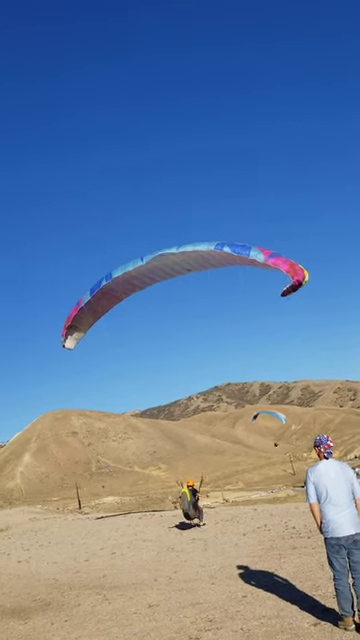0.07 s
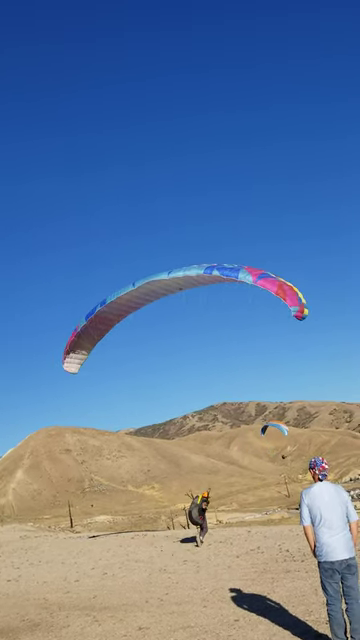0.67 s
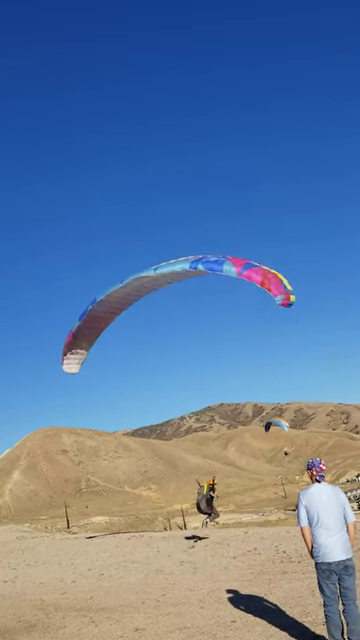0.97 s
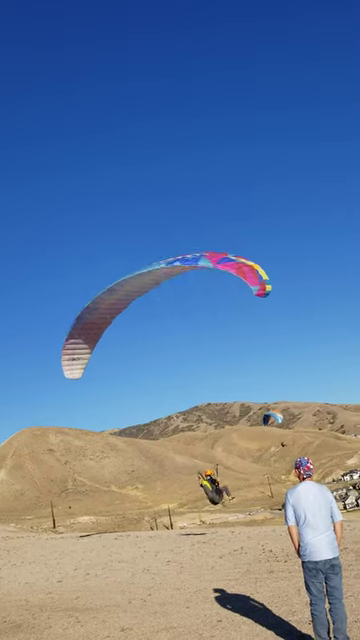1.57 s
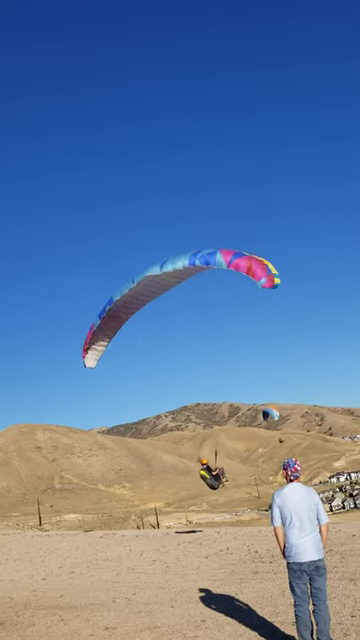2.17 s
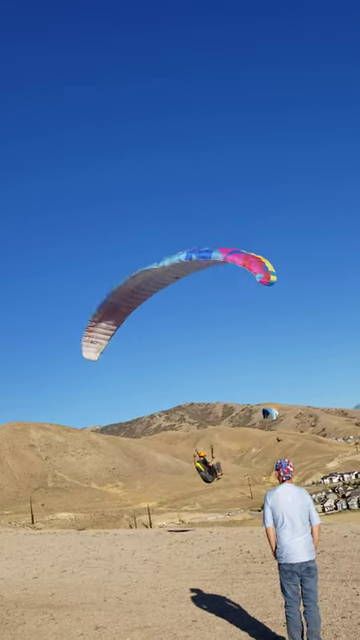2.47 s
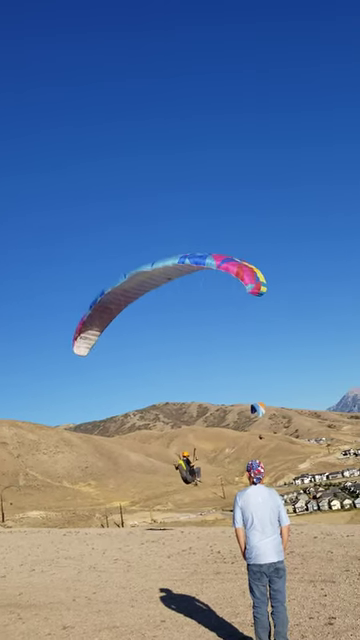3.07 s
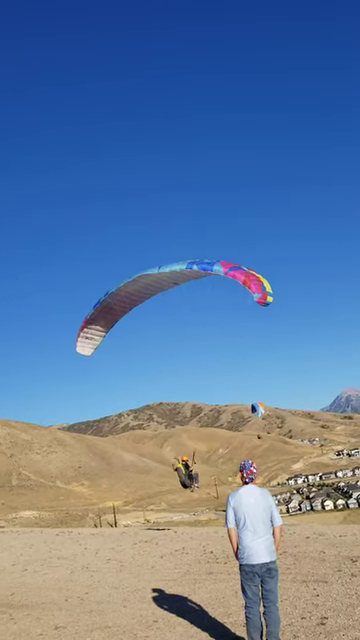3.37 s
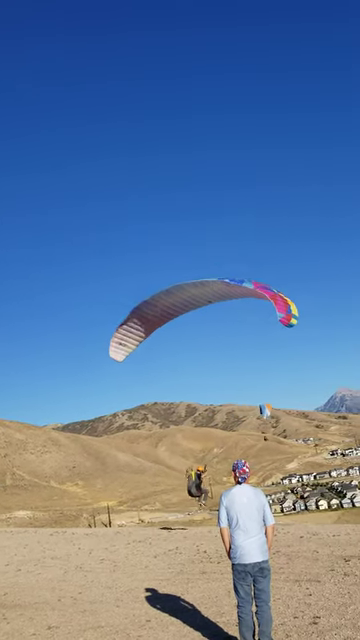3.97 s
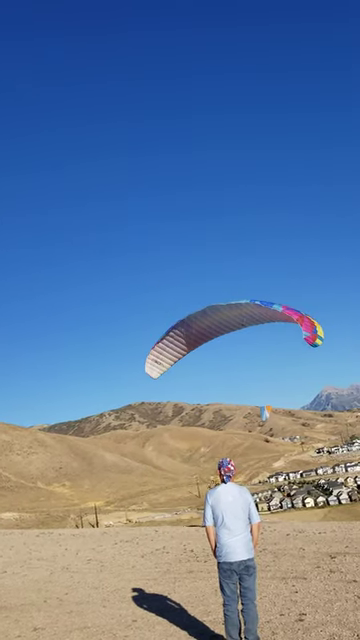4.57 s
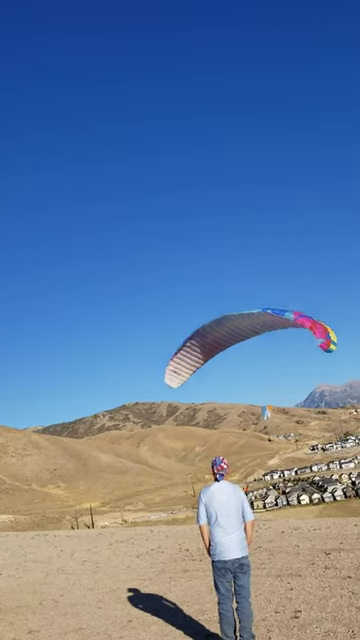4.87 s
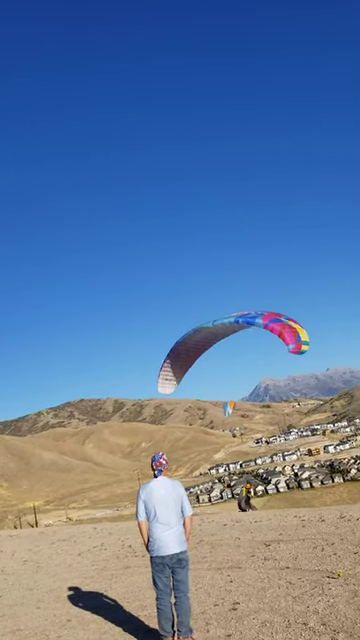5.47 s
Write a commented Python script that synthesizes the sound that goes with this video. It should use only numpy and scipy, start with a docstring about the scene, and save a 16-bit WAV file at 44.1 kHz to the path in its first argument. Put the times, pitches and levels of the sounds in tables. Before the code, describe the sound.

Wind rumbles and thumps on the microphone on an open hillside, with a faint rustle of paraglider fabric.

```python
"""On an open hillside, wind buffets the two ports of a hand-held microphone.
Passing eddies make the pressure at the ports fluctuate: they rumble, flutter and thump,
and the left port drops into lulls as the flow leaves it. Behind them the air on the slope roars,
with a faint tone in it. A dry rustle, as of fabric in the wind, swells in the middle,
and the thin hiss of the microphone lies under it all."""
import sys
import numpy as np
from scipy import signal
from scipy.fft import irfft, next_fast_len
from scipy.io import wavfile
from scipy.ndimage import uniform_filter1d

SR = 44100
rng = np.random.default_rng(int(sys.argv[2]) if len(sys.argv) > 2 else 0)


def wav_out(sig):
    """Save sig, one row per channel (or a flat mono array), as 16-bit PCM at SR to the path in sys.argv[1]."""
    wavfile.write(sys.argv[1], SR, np.round(np.clip(np.atleast_2d(sig).T, -1, 1) * 32767).astype(np.int16))


N = 247842
TIME = np.arange(N) / SR
FFT_SIZE = next_fast_len(N, real=True)
BIN_HZ = np.fft.rfftfreq(FFT_SIZE, 1 / SR)


def gain(db):
    """Amplitude ratio of a level in decibels."""
    return 10 ** (np.asarray(db) / 20)


def unit_rms(x):
    """Normalisation to rms 1."""
    return x / np.sqrt(np.mean(x ** 2) + 1e-20)


def gaussian(offset, width):
    """Bell curve of height 1."""
    return np.exp(-.5 * np.clip(offset / width, -10, 10) ** 2)


def over_time(rows):
    """Table columns interpolated at every sample."""
    time_s, *columns = np.transpose(rows)
    return np.array([np.interp(TIME, time_s, column) for column in columns])


def over_frequency(rows):
    """Table columns interpolated over log frequency at every bin."""
    hz, *columns = np.transpose(rows)
    return np.array([np.interp(np.log(BIN_HZ + 1), np.log(hz), column) for column in columns])


def waveform(spectrum):
    """Inverse Fourier transform, scaled to rms 1."""
    return unit_rms(irfft(spectrum, FFT_SIZE)[..., :N])


def white_spectra():
    """Two independent white-noise spectra, one for each port."""
    real, imaginary = rng.standard_normal((2, 2, len(BIN_HZ)))
    return real + 1j * imaginary


def noise(spectrum):
    """Coloured noise, incoherent between the ports."""
    return waveform(white_spectra() * gain(over_frequency(spectrum)))


def wander(rate_hz):
    """Low-pass noise: a smooth random modulator for each port."""
    return waveform(white_spectra() * np.exp(-np.minimum(BIN_HZ / rate_hz, 10) ** 2))


def arriving_noise(spectrum, coherence, lag_s):
    """Path difference: partly coherent noise reaches the left port first."""
    left, independent = white_spectra()
    shared = np.clip(over_frequency(coherence)[0], 0, 1)
    right = shared * left + np.sqrt(1 - shared ** 2) * independent
    delay = np.exp(-2j * np.pi * BIN_HZ * lag_s)
    return waveform(np.array([left, right * delay]) * gain(over_frequency(spectrum)))


def scintillate(x, depth_db, patch_hz, patch_s=0.076):
    """Scintillation: turbulent air shifts a sound's level in patches of frequency and time."""
    frame, hop = 1024, 256
    cells = signal.stft(x, nperseg=frame, noverlap=frame - hop)[2]
    patches = rng.standard_normal(cells.shape[1:])
    patches = uniform_filter1d(patches, max(1, round(patch_hz * frame / SR)), axis=0)
    patches = uniform_filter1d(patches, max(1, round(patch_s * SR / hop)), axis=1)
    cells = cells * gain(depth_db * unit_rms(patches))
    return unit_rms(signal.istft(cells, nperseg=frame, noverlap=frame - hop)[1][:, :N])


# Relative spectral density of the hiss: frequency_hz, left_db, right_db
HISS_SPECTRUM = [(1420, 12, 9), (4200, -11, -4.5), (5640, -25, -23), (6350, -19, -13), (6300, -11, -2),
                 (7430, -21, -16), (9200, -10, -20), (11930, 1.5, 2.5), (15500, 5, -1)]
def hiss(level_db=-72.5, flicker_db=1.5):
    """Self-noise: the microphone adds a thin, nearly steady hiss."""
    return noise(HISS_SPECTRUM) * gain(level_db + flicker_db * wander(rate_hz=66))


# Envelope of the tone in the roar: time_s, level_db
MOAN_LEVEL = [(0, -84), (.7, -69.5), (3.1, -70), (3.7, -77), (5.6, -77)]
def moan(pitch_hz=598, width_hz=6):
    """Narrow-band noise: close frequencies beat, heard as a faint, wavering tone."""
    band = gaussian(BIN_HZ - pitch_hz, width_hz)
    return gain(over_time(MOAN_LEVEL)) * waveform(white_spectra()[0] * band)


# Envelope of the air on the slope: time_s, relative_level_db
ROAR_LEVEL = [(0.02, -64), (0.37, -65.5), (0.52, -68), (0.87, -63.5), (0.9, -64), (1.8, -65.5), (2.53, -60),
              (2.81, -67), (2.9, -58), (3.14, -68), (3.21, -63), (4.21, -64.5), (4.24, -60), (4.51, -64),
              (4.74, -64), (4.87, -70.0), (5.32, -61.5), (5.6, -64.0)]
# Its spectrum: frequency_hz, relative_density_db
ROAR_SPECTRUM = [(60, -34), (180, -15), (300, 0), (430, 0.5), (550, -4.5), (680, -4), (830, -8),
                 (1050, -15), (1350, -25.5), (2100, -33.5), (4000, -58.5), (8000, -50.5)]
# Its likeness at the two ports: frequency_hz, coherence
ROAR_COHERENCE = [(100, 0.64), (350, 0.77), (700, 0.97), (1400, 1), (3000, 0.069)]
def roar(gain_db=6.5, waver_db=1.5):
    """Aerodynamic noise: air rushing over the slope roars in slow swells with a quick waver."""
    air = arriving_noise(ROAR_SPECTRUM, ROAR_COHERENCE, lag_s=0.00018)
    air = scintillate(air, depth_db=3, patch_hz=156)
    return air * gain(over_time(ROAR_LEVEL) + gain_db + waver_db * wander(rate_hz=47)[0])


# Soft ticks within the rustle: time_s, pitch_hz, level_db
TICKS = [(2.578, 1380, -62.5), (2.861, 1370, -60), (2.886, 1670, -57), (2.972, 2920, -64)]
def ticks(width_s=0.0057, width_hz=300):
    """Gated noise: a narrow band under a short envelope is heard as a brief rasp."""
    out = np.zeros((2, N))
    for time_s, pitch_hz, level_db in TICKS:
        rasp = waveform(white_spectra() * gaussian(BIN_HZ - pitch_hz, width_hz))
        out += gain(level_db) * gaussian(TIME - time_s, width_s) * rasp
    return out


# Drive of the rustle: time_s, strength_db
RUSTLE_STRENGTH = [(.05, -79.5), (.5, -78), (.65, -66.5), (.69, -60.5), (.78, -71), (1.66, -72.5),
                   (1.77, -83), (1.92, -86), (1.98, -65), (2.17, -62.5), (2.38, -69), (2.6, -63),
                   (2.97, -59.5), (3.0, -64), (3.15, -74.5), (3.33, -65), (3.38, -71), (3.58, -71.5),
                   (3.75, -86), (4.26, -82.5), (4.7, -83.5), (5.05, -80), (5.19, -72), (5.5, -82)]
# Relative spectral densities, with each port's own resonances: frequency_hz, left_db, right_db
LIGHT_RUSTLE_SPECTRUM = [(500, -3.5, -14), (1340, -9.5, 5), (1960, 1, -8), (3500, 0.5, -4.5),
                         (3940, 2.5, 1), (4970, -6.5, -6), (6490, -6.5, 9), (6950, -13, 2.5),
                         (7280, -16, -29.5), (8300, -29, -35), (10100, -16, -14), (15600, -7.5, -27)]
FIRM_RUSTLE_SPECTRUM = [(600, -7, -5), (1340, 10.5, 8.5), (1940, -8, -2.5), (3070, 4.5, 4.5),
                        (3900, 2.5, 4), (5030, 2, -1), (5830, -2, -32), (7800, -7.5, -7), (8600, -9, -44.5),
                        (10600, -7, -7.5), (15600, -13, -16)]
# Likeness of the rustle at the two ports: frequency_hz, coherence
RUSTLE_COHERENCE = [(1500, 0.35), (6500, 0.25), (14000, 0.18)]
def rustle(light_db=-63.5, firm_db=-61.5, light_exponent=0.67, firm_exponent=1.7):
    """Power-law growth: as a thin, sibilant rustle gets firmer, a broader swish overtakes it."""
    reference_db, flicker_db = -61, 0.6
    strength_db = over_time(RUSTLE_STRENGTH) - reference_db + flicker_db * wander(rate_hz=70)[0]
    out = np.zeros((2, N))
    for spectrum, level_db, exponent in ((LIGHT_RUSTLE_SPECTRUM, light_db, light_exponent),
                                         (FIRM_RUSTLE_SPECTRUM, firm_db, firm_exponent)):
        swish = arriving_noise(spectrum, RUSTLE_COHERENCE, lag_s=0.000346)
        swish = scintillate(swish, depth_db=2.3, patch_hz=226)
        out += swish * gain(level_db + exponent * strength_db)
    return out


# Lulls at the left port: start_s, length_s
LULLS = [(0, .08), (.11, 0.088), (0.262, 0.084), (1.33, 0.11), (1.94, 0.072), (2.2, 0.24), (3.104, 0.092),
         (3.923, 0.059), (4.547, 0.087), (4.784, 0.04), (4.993, 0.082), (5.406, 0.084)]
def lulls_db(left_db=-27.5, right_db=-2, edge_s=0.046):
    """Wind noise follows the local flow: its level drops while the flow leaves the left port."""
    away = sum(np.clip(.5 + np.minimum(TIME - start_s, start_s + length_s - TIME) / edge_s, 0, 1)
               for start_s, length_s in LULLS)
    return np.minimum(away, 1) * np.array([[left_db], [right_db]])


# Strength of the wind at the microphone: time_s, relative_level_db
WIND_LEVEL = [(0.02, -37), (1.01, -37.5), (1.04, -41), (1.35, -36.5), (1.67, -38), (1.74, -42), (2.18, -33),
              (2.41, -40.5), (2.59, -37), (3.18, -39), (3.56, -38), (3.78, -34), (3.99, -43.5),
              (4.44, -39.5), (4.54, -41.5), (5.26, -37.5), (5.34, -41), (5.6, -36.5)]
# Pressure spectra of large and of small eddies: frequency_hz, relative_density_db
RUMBLE_SPECTRUM = [(12, -22), (25, -7), (40, -7.5), (60, 1.5), (85, -3), (125, -7.5), (190, -14),
                   (300, -24), (600, -36), (1500, -76.5), (4000, -104)]
FLUTTER_SPECTRUM = [(80, -33), (160, -3.5), (240, 1.5), (380, -3), (550, -10.5), (780, -29.5), (1100, -63),
                    (3000, -66.5)]
def turbulence(left_db=-2.9, right_db=-1.37, flutter_db=-15.5, flutter_pan_db=3):
    """Intermittency: passing eddies make the rumble lumpy and carry small ones that flutter in step."""
    rumble_lump_db, flutter_lump_db, flutter_lull_share = 3.5, 6, 0.25
    wind_db, lull_db = over_time(WIND_LEVEL), lulls_db()
    local, shared = wander(rate_hz=25.3), wander(rate_hz=25.3)[0]  # half the eddies span both ports
    eddies = 2 * np.tanh(unit_rms(local + shared) / 2)
    rumble = unit_rms(noise(RUMBLE_SPECTRUM) * gain(rumble_lump_db * eddies))
    rumble *= gain(wind_db + lull_db + [[left_db], [right_db]])
    flutter = unit_rms(noise(FLUTTER_SPECTRUM) * gain(flutter_lump_db * eddies))
    flutter *= gain(wind_db + flutter_lull_share * lull_db + flutter_db)
    return rumble + flutter * gain([[flutter_pan_db], [-flutter_pan_db]])


# Knots of small eddies: centre_s, length_s, relative_level_db
FLURRIES = [(0.089, 0.031, -44), (0.375, 0.087, -37), (0.732, 0.039, -39.5), (1.588, 0.031, -36),
            (1.838, 0.043, -40), (2.021, 0.034, -45), (2.124, 0.049, -37.5), (2.501, 0.057, -41),
            (2.595, 0.012, -34), (2.675, .06, -43), (3.337, 0.061, -49), (3.71, 0.14, -46.5),
            (3.874, 0.09, -49.5), (4.36, 0.083, -52), (4.882, 0.076, -47), (5.209, 0.072, -37.5)]
def flurries(gain_db=-5.5, pan_db=1.4, rumble_db=-1.5, ragged_db=7.5):
    """Amplitude modulation: a knot of small eddies swells and fades as ragged flutter over rumble."""
    swell = sum(gain(level_db) * gaussian(TIME - centre_s, length_s / 2)
                for centre_s, length_s, level_db in FLURRIES)
    flutter = unit_rms(noise(FLUTTER_SPECTRUM) * gain(ragged_db * np.tanh(wander(rate_hz=69.6))))
    flutter *= gain([[pan_db], [-pan_db]])
    rumble = gain(rumble_db) * noise(RUMBLE_SPECTRUM)
    return swell * gain(gain_db) * (flutter + rumble)


# The strongest eddies, one thump each: centre_s, nominal_pitch_hz, left_db, right_db
BUFFETS = [(0.098, 96, -48, -24.5), (0.24, 89, -27.5, -22.5), (.372, 139, -27, -48), (0.46, 93, -26, -24.5),
           (.691, 76, -37, -26), (.927, 78, -47, -31), (.991, 100, -36, -26), (1.627, 73, -24.5, -30),
           (1.768, 79.5, -27, -25), (2.108, 100, -33, -21.5), (2.304, 89, -37, -29),
           (2.517, 74, -29, -22.5), (2.594, 79, -24.5, -28), (2.667, 102, -27.5, -29.5),
           (2.7, 69.4, -19, -18), (2.744, 78.5, -31, -28), (2.958, 105, -24, -28.5), (3.322, 83, -29, -31),
           (3.363, 103, -29.5, -25.5), (3.677, 70, -21.5, -23), (3.718, 79.4, -24, -20.5),
           (3.821, 93, -35, -23), (3.846, 84.5, -28, -27), (4.189, 117, -26.5, -28),
           (4.369, 76, -23, -22.5), (4.449, 81.6, -28, -47), (4.746, 118, -29.5, -28),
           (5.187, 79, -30, -33)]
def buffets(width_cycles=0.41, tear_db=-23.5, pitch_scatter=0.11, skew_cycles=0.17):
    """Energy cascade: a large eddy swings the pressure once or twice and tears into smaller ones."""
    swing, envelope = np.zeros((2, 2, N))
    for centre_s, pitch_hz, left_db, right_db in BUFFETS:
        detune, skew = rng.standard_normal((2, 2, 1))
        phase = rng.random() + skew_cycles * skew  # nearly in step at the two ports
        near = abs(TIME - centre_s) < .05
        cycles = (TIME[near] - centre_s) * pitch_hz
        bell = gain([[left_db], [right_db]]) * gaussian(cycles, width_cycles)
        swing[:, near] += bell * np.cos(2 * np.pi * (cycles * np.exp(pitch_scatter * detune) + phase))
        envelope[:, near] += bell
    return swing + gain(tear_db) * envelope * noise(FLUTTER_SPECTRUM)


def scene():
    """Superposition: the wind at the ports adds to the background sounds."""
    wind = turbulence() + flurries() + buffets()
    return wind + roar() + moan() + rustle() + ticks() + hiss()


def record(dry, cutoff_hz=15800):
    """Band limiting: a low-pass filter removes the highest treble."""
    lowpass = signal.firwin(801, cutoff_hz, window=("kaiser", 9), fs=SR)
    return signal.oaconvolve(dry, lowpass[None], "same")


dry = scene()
out = record(dry)
wav_out(out)
```